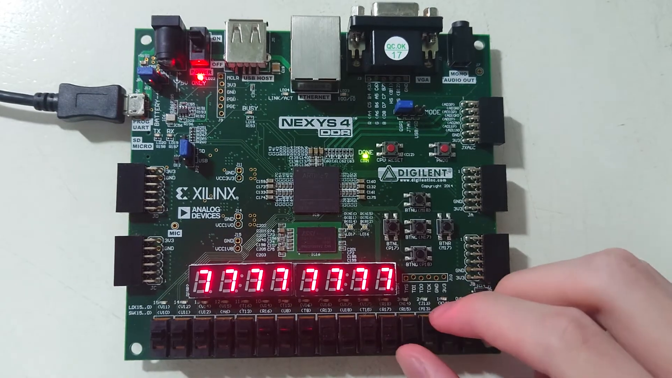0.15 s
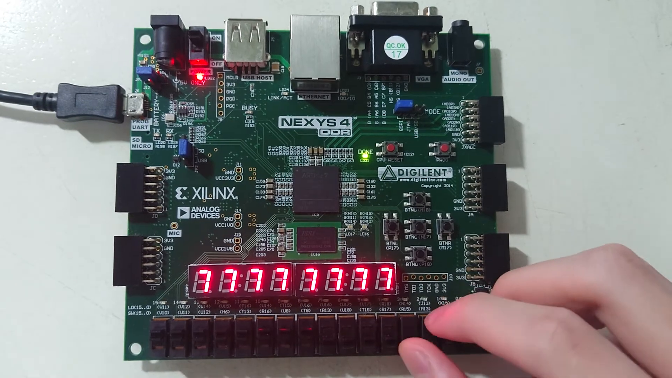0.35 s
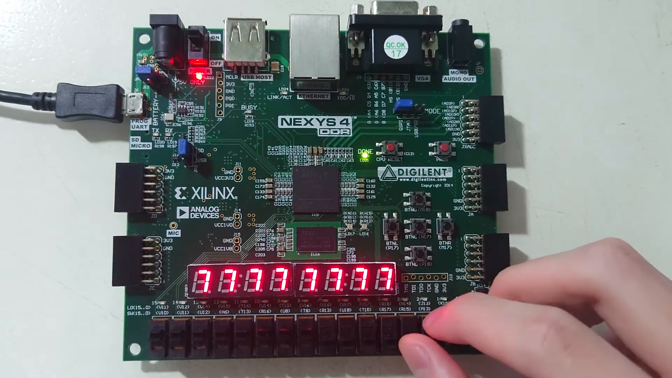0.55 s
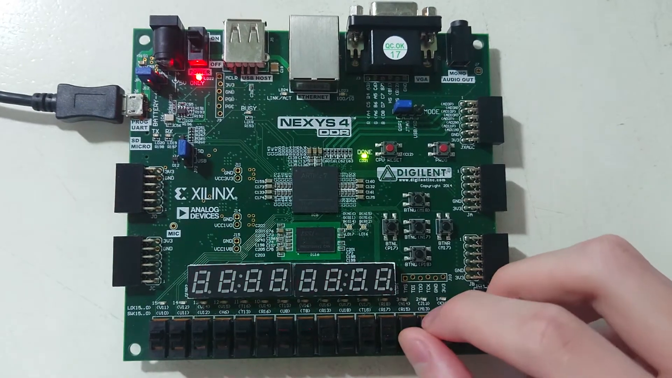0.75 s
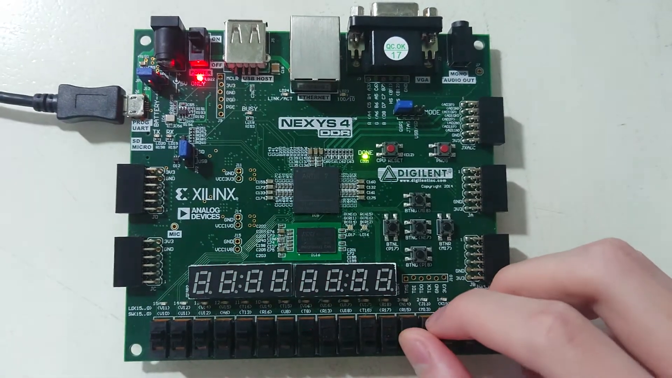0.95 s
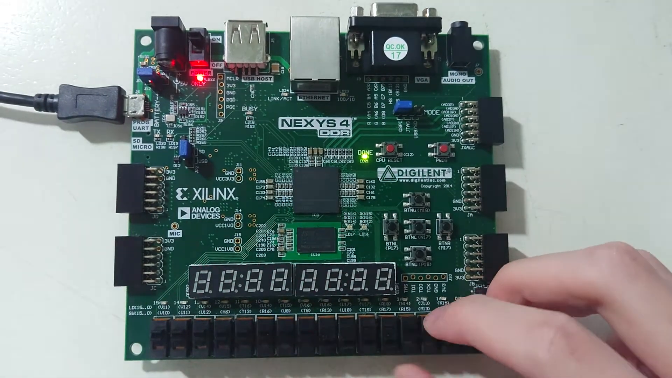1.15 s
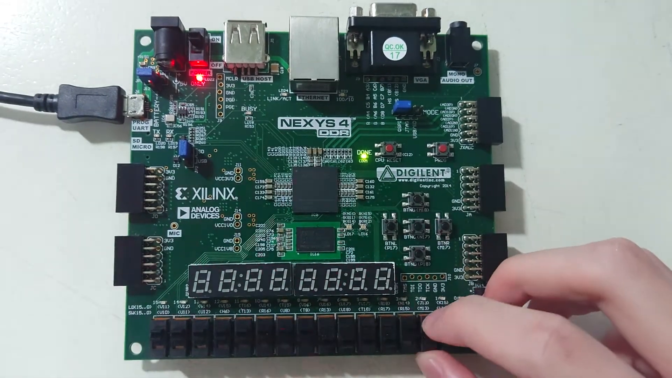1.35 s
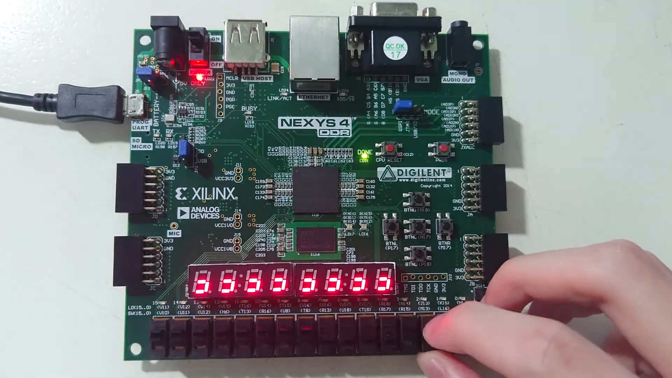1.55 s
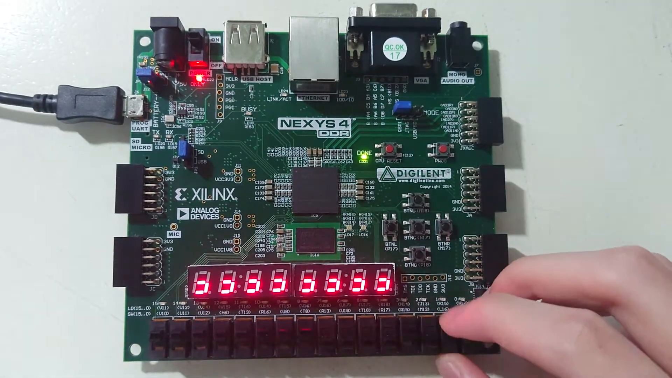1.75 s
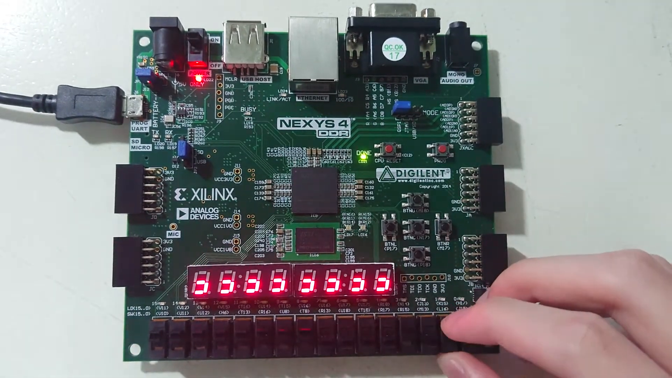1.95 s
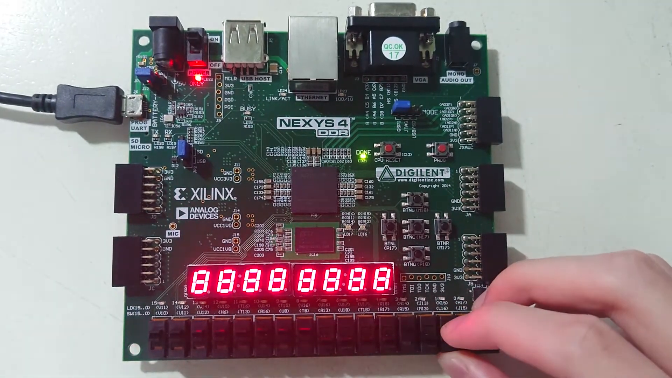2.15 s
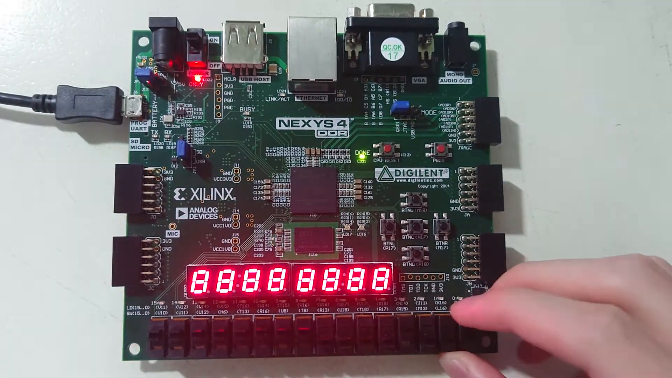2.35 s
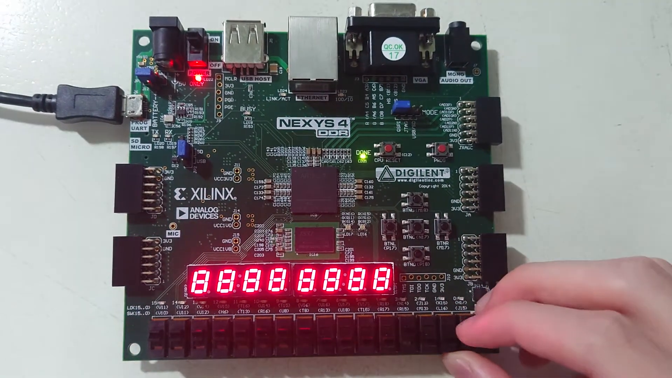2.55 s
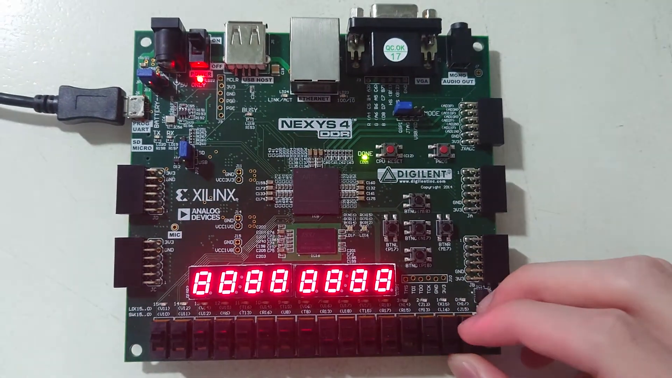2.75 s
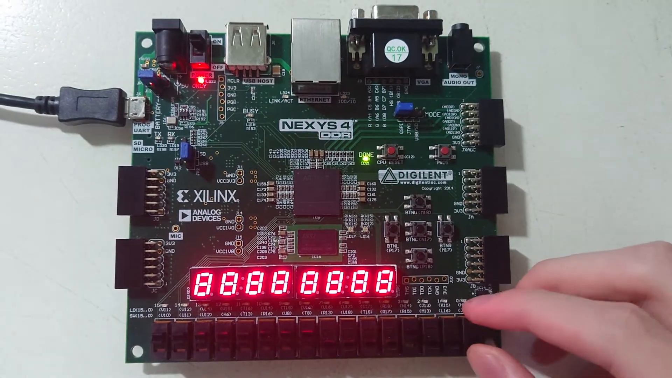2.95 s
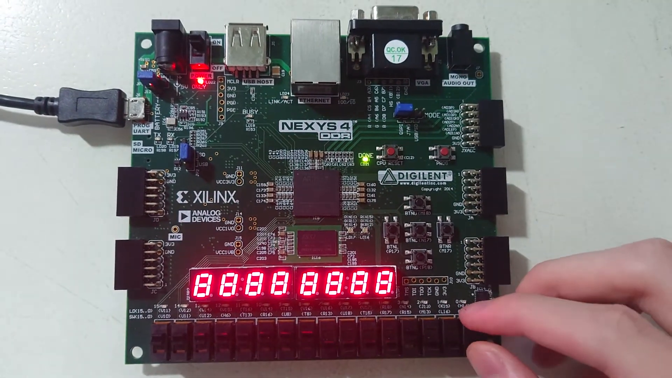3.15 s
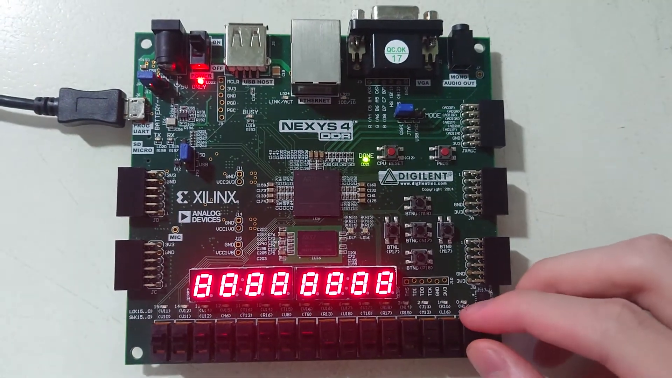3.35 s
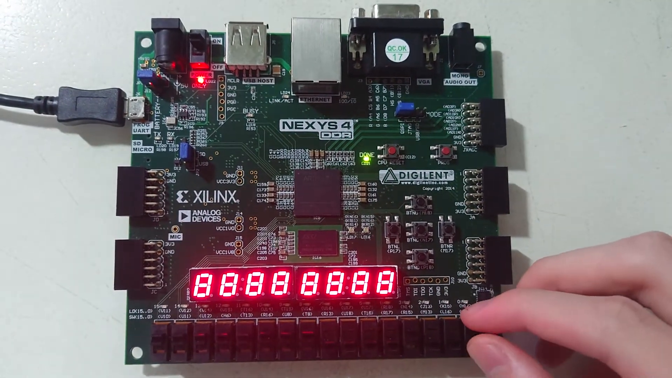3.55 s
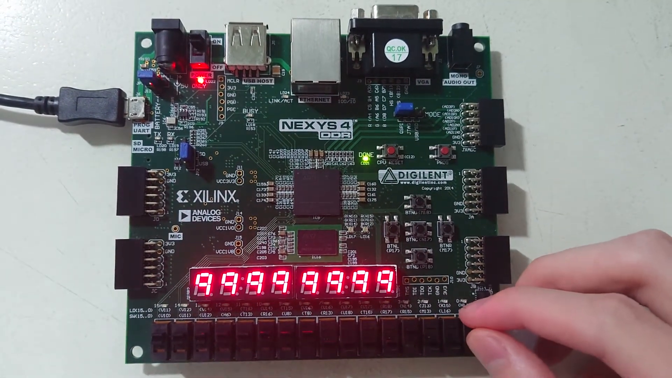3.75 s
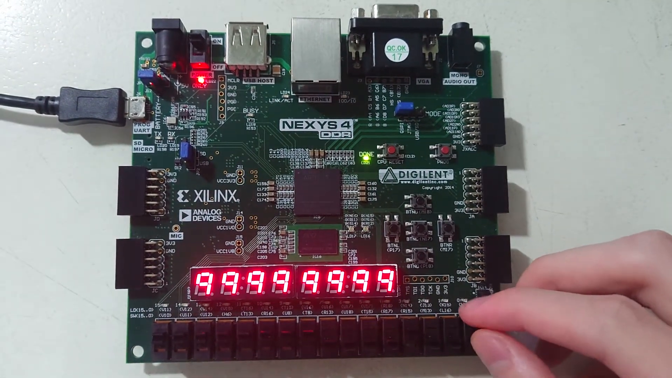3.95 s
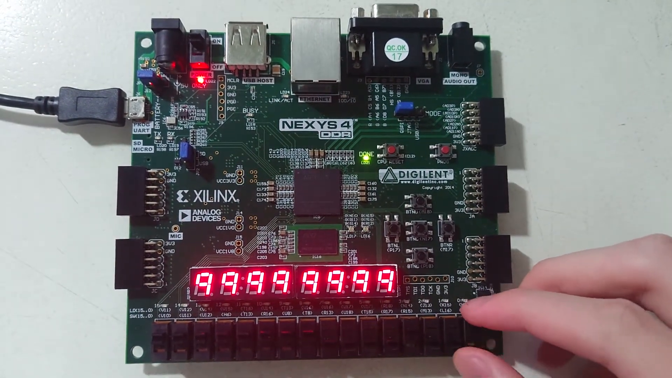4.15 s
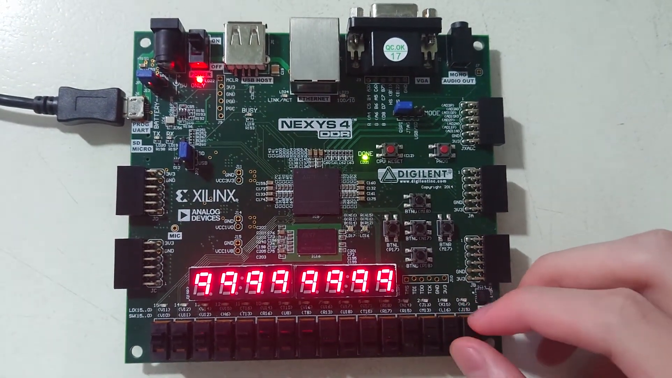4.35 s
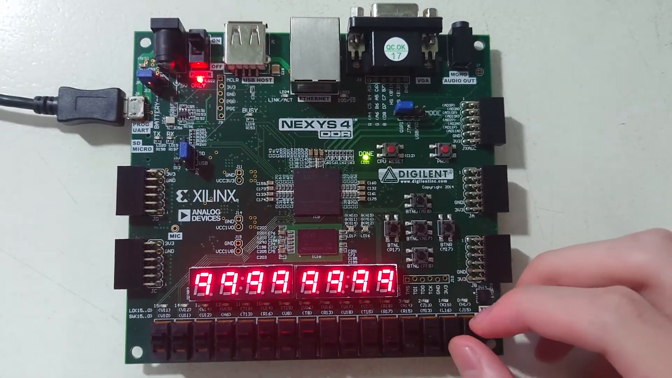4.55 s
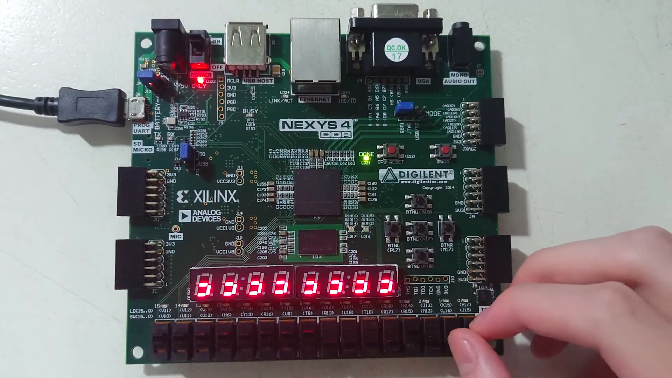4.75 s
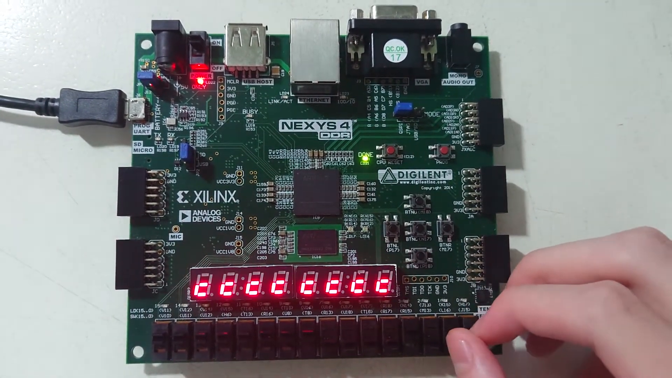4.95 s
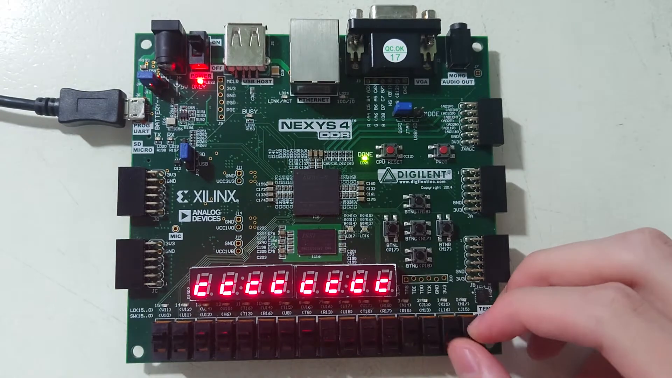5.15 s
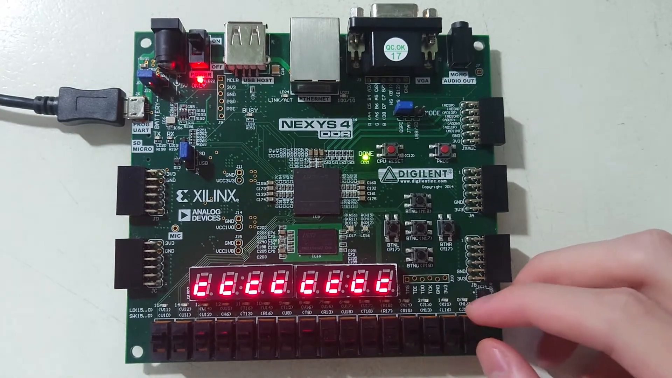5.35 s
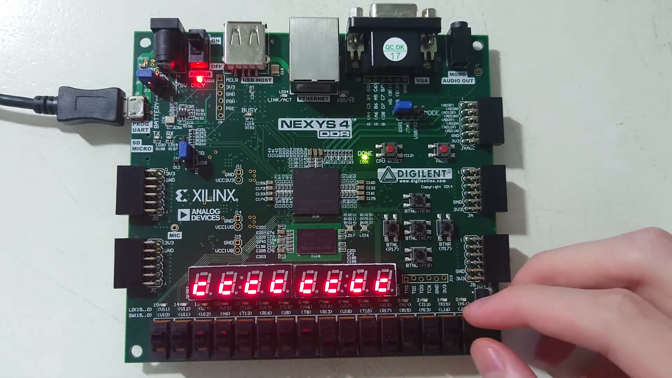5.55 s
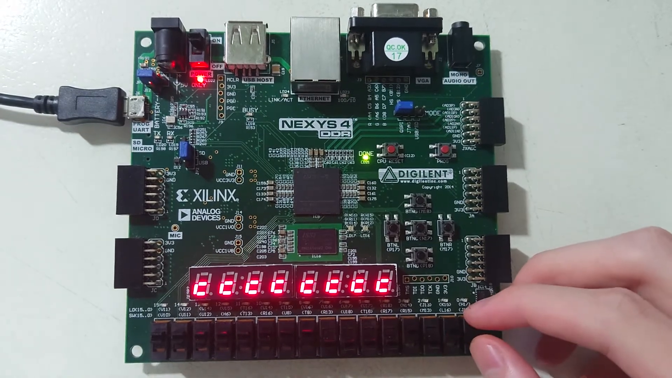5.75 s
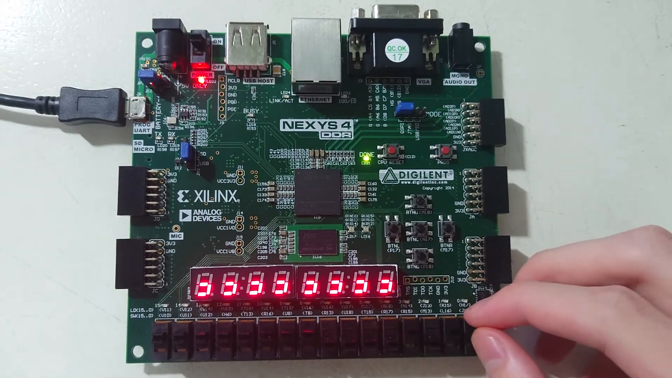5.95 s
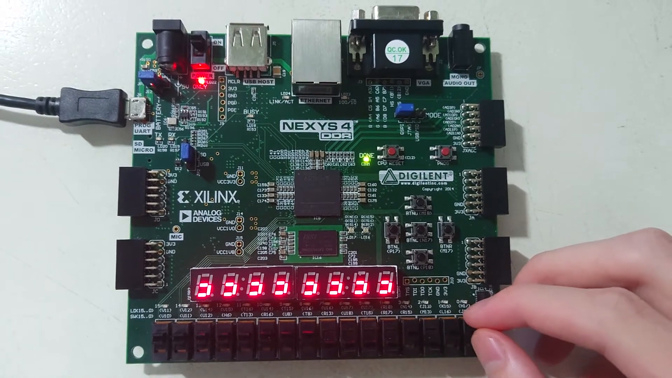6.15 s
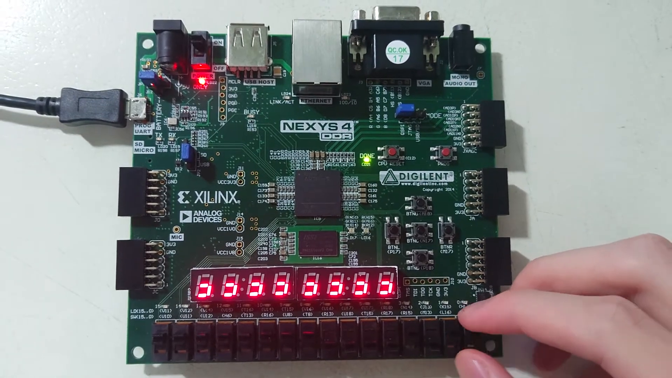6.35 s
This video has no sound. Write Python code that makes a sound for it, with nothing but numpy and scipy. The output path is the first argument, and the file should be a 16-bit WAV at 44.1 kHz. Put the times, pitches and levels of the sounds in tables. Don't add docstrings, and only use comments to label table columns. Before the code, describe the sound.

Eight crisp, dry plastic-and-metal switch clicks at uneven intervals, some soft, some hard, above quiet steady hum and airy hiss indoors.

```python
import sys
import numpy as np
from scipy import signal
from scipy.fft import rfft, irfft
from scipy.io import wavfile
from scipy.ndimage import uniform_filter1d

SR = 44100
rng = np.random.default_rng(int(sys.argv[2]) if len(sys.argv) > 2 else 0)


def int16_out(signal):
    q = np.round(np.clip(np.atleast_2d(signal).T, -1, 1) * 32767)
    wavfile.write(sys.argv[1], SR, q.astype(np.int16))


def ratio(d):
    e = np.asarray(d, float) / 20
    return 10 ** e


N = 282353
TOP_HZ = 15750

HUM_HZ = [34.77, 69.6, 117.26, 120.01, 122.31, 126.92, 176.12, 240.04]
HUM_STEP_S = [0, 0, .04, 0, .065, .128, 0, 0]
# (level [dB rms], left minus right [dB])
HUM_LEVELS = [(-83, 6), (-75, 13), (-64.5, -3.5), (-48.5, -2.5), (-54.5, -1.5), (-64.5, 0), (-68.5, 3.5),
              (-68, -15.5)]
# (time [s], level [dB rms])
MOTOR_LEVEL = [
    (0, -51.5),
    (1.07, -52),
    (2.2, -64.5),
    (4.5, -63.5),
    (5.3, -70),
    (6.4, -60),
]
# (time [s], speed [turns/s])
FAN_SPEED = [(0, 67.5), (1.3, 67.5), (2, 67.3), (2.6, 67.08), (3.5, 66.92), (4.7, 66.9), (6.4, 66.66)]
# (multiple of the shaft [1], level [dB rms], left minus right [dB])
FAN_OVERTONES = [(1, -59.5, -6), (2, -63.5, -13.5), (3, -69.5, -7), (4, -61.5, -5), (5, -58, 0.5),
                 (6, -63.5, -6), (7, -77, 2), (8, -67, 4), (13, -67, 0), (14, -73.5, 2), (15, -68, -13.5),
                 (16, -65.5, 3), (20, -60, 1), (30, -75, -4.5)]
# (frequency [Hz], density [dB per Hz])
AIR_COLOUR = [(18, -46), (30, -20.5), (80, -14), (300, -15), (855, -18), (1480, -24), (7200, -34),
              (15600, -38)]
# (frequency [Hz], side minus mid [dB])
AIR_WIDTH = [(60, -12), (110, -23), (200, -33), (380, -7), (700, -2.5), (1290, -2), (2380, 0.5),
             (15000, 0.5)]
# (frequency [Hz], left minus right [dB])
AIR_PAN = [(60, -0.5), (200, 1), (380, 2), (700, -3), (1290, 3.5), (2380, 6.5), (4400, -1), (15000, -2)]
# (frequency [Hz], width [Hz], level [dB])
DUCT = [(128.4, 61, 12), (197, 89, -5), (325, 33, 5.5), (514, 106, -2), (638.5, 47, 6.5), (733, 104, -5.5),
        (850, 8.9, 5), (1158, 34, 4.5), (3100, 280, 0.5), (7980, 330, -9), (9300, 3000, -2.5)]
# (frequency [Hz], level [dB], t60 [s], left minus right [dB])
BOARD = [(2090, -1.5, 0.015, 13), (2263, -5, .016, 10.5), (2780, -4, 0.013, 10.5), (3264, -5, 0.018, 15),
         (3690, -12, 0.0068, -13), (4025, 0, 0.03, 8.5), (4260, -3, 0.02, 11.5)]
# (frequency [Hz], level [dB], t60 [s], left minus right [dB])
SHELL = [(8830, -12, 0.0065, -21), (9840, -11.5, 0.02, 10), (11240, 1, 0.0058, 11), (12630, -5, 0.0098, 13),
         (13100, 0.5, 0.011, 8), (14600, 7, 0.008, 1), (15200, 0, .009, 7)]
# (frequency [Hz], level [dB], t60 [s], left minus right [dB])
SLIDER = [(5050, -3, .009, 7), (5450, 2, .012, 8), (5850, 3.5, .017, 2), (6050, -10, .08, -2),
          (6450, -1, .01, 2), (6900, -1, .009, 6), (7250, 3, .01, 7)]
# (spread [Hz], most lost [dB])
FAVOUR = [(550, 11), (1500, 8), (600, 6)]
# (time [s], peak [dB], board [dB], shell [dB], slider ring [Hz])
FLIPS = [
    (.7103, -40.5, -16, -11, 5500),
    (1.5398, -20, -8.5, -2.5, 6700),
    (2.1418, -25, -5.5, -4.5, 6030),
    (2.6177, -33, 3.5, -18, 5560),
    (3.6969, -26, -4.5, -8.5, 5160),
    (4.7601, -41, -7, -8, 6040),
    (4.9056, -20, -7.5, -20, 6340),
    (5.9987, -27, -4, -10.5, 5040),
]
# (time [s], peak [dB], board [dB], slider ring [Hz], board ring [Hz])
BOUNCES = [(1.5406, -25, -4.5, 6900, 4000), (1.5444, -28, -11, 6600, 4000), (2.1428, -27.5, 0, 5850, 2250),
           (2.147, -31.5, 1.5, 5900, 4450), (2.1578, -32, -13, 5770, 4400), (2.1585, -26, -9, 6940, 3300),
           (3.6954, -45, -20, 6000, 3000), (3.701, -43, 12, 5550, 2050), (3.7134, -47, -6, 5900, 2100),
           (4.9105, -33, -7, 5900, 3500), (6.0005, -42.5, 13, 4960, 2250)]

RATTLE_S = 0.001


def ears(pan_db):
    return ratio(np.array([[pan_db], [-pan_db]]) / 2)


def on_log(table, hz):
    f, v = np.transpose(table)
    return np.interp(np.log(hz), np.log(np.maximum(f, 1)), v)


def walk(rate_hz):
    hold = int(SR / rate_hz)
    steps = np.repeat(rng.standard_normal(N // hold + 1), hold)
    smooth = uniform_filter1d(uniform_filter1d(steps, hold), hold)
    return 1.43 * smooth[:N]


def hum():
    t = np.arange(N) / SR
    mains_hz = HUM_HZ[3]
    motor_hz, motor_pan_db = 58.73, -0.8
    motor_db = np.interp(t, *np.transpose(MOTOR_LEVEL))
    out = np.sqrt(2) * ratio(motor_db) * ears(motor_pan_db) * np.cos(2 * np.pi * motor_hz * t)
    for hz, step_s, (db, pan_db) in zip(HUM_HZ, HUM_STEP_S, HUM_LEVELS):
        turns = hz * (t - step_s) + mains_hz * step_s
        out = out + np.sqrt(2) * ratio(db) * ears(pan_db) * np.cos(2 * np.pi * turns)
    return out


def fan():
    weak = (-74.5, -8.5)
    opposed_hz = 1045
    swell_db, swell_s = 3, 1.2
    t = np.arange(N) / SR
    speed = np.interp(t, *np.transpose(FAN_SPEED)) * (1 + .0006 * walk(4))
    turns = np.cumsum(speed) / SR
    loudness_db = 0.5 - swell_db * np.exp(-t / swell_s)
    strong = {round(k): (db, pan_db) for k, db, pan_db in FAN_OVERTONES}
    out = 0
    for k in range(1, 31):
        db, pan_db = strong.get(k, weak)
        lag = .45 if k * FAN_SPEED[0][1] > opposed_hz else .1
        level = ratio(db + loudness_db + 2 * walk(3.12)) * ears(pan_db)
        phase = k * turns + rng.random() - np.array([[0], [lag]])
        out = out + np.sqrt(2) * level * np.cos(2 * np.pi * phase)
    return out


def air():
    air_db = -47
    hz = np.maximum(np.arange(N // 2 + 1) * SR / N, 1)
    db = on_log(AIR_COLOUR, np.minimum(hz, 14500))
    for centre_hz, width_hz, peak_db in DUCT:
        db = db + peak_db / (1 + (2 * (hz - centre_hz) / width_hz) ** 2)
    noise = rfft(rng.standard_normal((2, N)))
    mid, side = noise * ratio(db) * (hz > 20) * (hz < TOP_HZ)
    side = side * ratio(on_log(AIR_WIDTH, hz))
    pan = ratio(on_log(AIR_PAN, hz) / 2)
    both = irfft(np.array([(mid + side) * pan, (mid - side) / pan]), N)
    return both / np.sqrt(np.mean(both ** 2)) * ratio(air_db + walk(1.5) / 4)


def blows():
    snap_board_hz = 2400
    early_db = 8
    dull_db, dull_s = 8, .004
    rows = [flip + (snap_board_hz,) for flip in FLIPS]
    for s, db, board_db, slider_hz, board_hz in BOUNCES:
        flip = min(FLIPS, key=lambda row: abs(row[0] - s))
        after_s = max(s - flip[0], 0)
        shell_db = flip[3] + early_db * (s < flip[0]) - dull_db * (1 - np.exp(-after_s / dull_s))
        rows.append((s, db, board_db, shell_db, slider_hz, board_hz))
    return sorted(rows)


def ring(modes, t, rise_s, near_hz, spread_hz, lose_db):
    out = 0
    for hz, db, t60, pan_db in modes:
        detune, late, left, lag = rng.random(4)
        db = db - lose_db * (1 - np.exp(-((hz - near_hz) / spread_hz) ** 2))
        since = np.maximum(t - late * RATTLE_S, 0)
        swell = 1 - np.exp(-(since / rise_s) ** 2)
        decay = np.exp(-np.log(1000) * since / np.clip(t60, .003, .09))
        turns = hz * (1 + .03 * (detune - .5)) * t + left + np.array([[0], [lag]])
        out = out + ratio(db) * ears(pan_db) * swell * decay * np.sin(2 * np.pi * turns)
    return out


def crack(t):
    hz, length_s = 4000, 0.00019
    late = t - RATTLE_S
    return ears(12) * np.exp(-(late / length_s) ** 2) * np.sin(2 * np.pi * hz * late)


def desk_tail(near, t):
    t60 = .19
    echoes = rng.standard_normal((2, len(t))) * np.exp(-np.log(1000) * t / t60) * (t > .003)
    echoes = signal.sosfilt(signal.cheby2(8, 40, TOP_HZ + 300, fs=SR, output="sos"), echoes)
    return signal.fftconvolve(near, echoes, axes=1)[:, :len(t)]


def switches():
    metal_rise_s, board_rise_s = 0.0001, 0.00086
    shell_per_slider = 2.07
    grip = 0.17
    roughness, crack_db = 0.25, -2
    snap_db, tail_db = -2, -42
    out, t = np.zeros((2, N + SR)), np.arange(SR // 4) / SR
    for s, db, board_db, shell_db, slider_hz, board_hz in blows():
        metal = ring(SLIDER, t, metal_rise_s, slider_hz, *FAVOUR[0])
        shell = ring(SHELL, t, metal_rise_s, shell_per_slider * slider_hz, *FAVOUR[1])
        metal += ratio(shell_db + 5.5) * shell
        chatter = 5 * uniform_filter1d(rng.standard_normal((2, len(t))), size=25)
        held = [(hz, g, t60 * ratio(grip * (shell_db + 5)), pan) for hz, g, t60, pan in BOARD]
        board = ring(held, t, board_rise_s, board_hz, *FAVOUR[2])
        near = metal * (1 + roughness * chatter) + ratio(board_db + 4) * board
        near += ratio(board_db + crack_db) * crack(t)
        start = int(s * SR)
        out[:, start:start + len(t)] += ratio(db + snap_db) * (near + ratio(tail_db) * desk_tail(near, t))
    return out[:, :N]


def scene():
    return hum() + fan() + air() + switches()


def band_limit(x):
    return signal.sosfilt(signal.butter(12, 17150, fs=SR, output="sos"), x)


def record(dry):
    mix = signal.sosfilt(signal.cheby2(10, 45, 17000, fs=SR, output="sos"), dry)
    return band_limit(mix)


dry = scene()
out = record(dry)
int16_out(out)
```